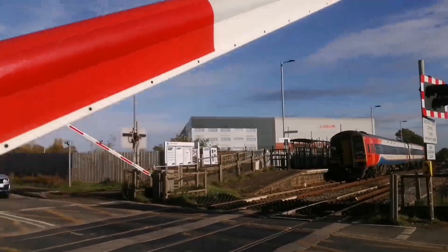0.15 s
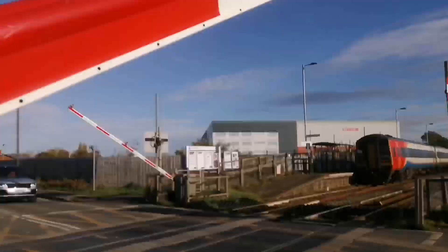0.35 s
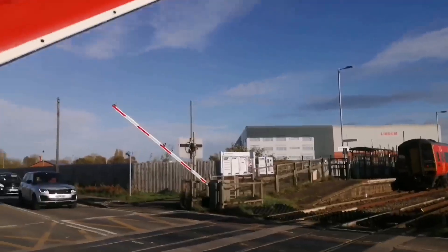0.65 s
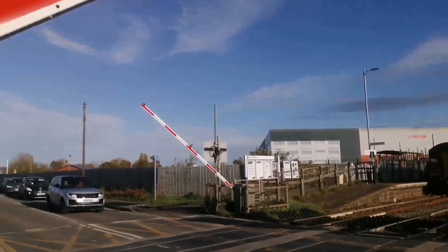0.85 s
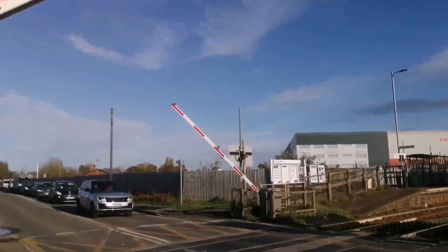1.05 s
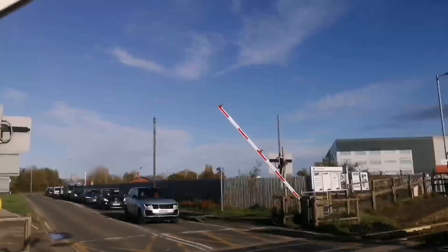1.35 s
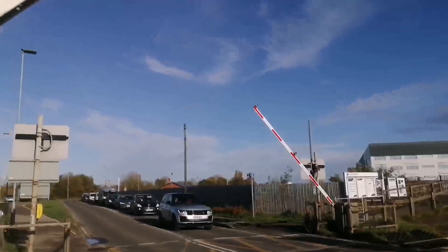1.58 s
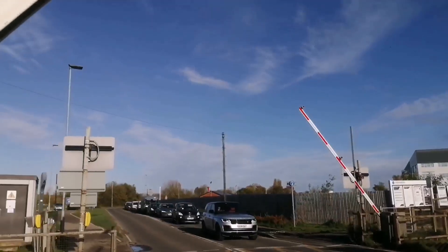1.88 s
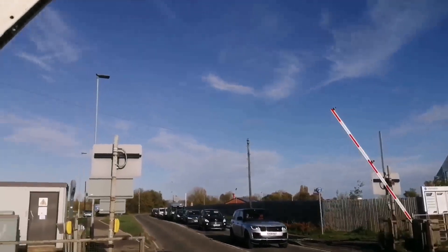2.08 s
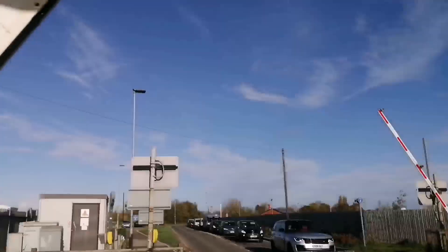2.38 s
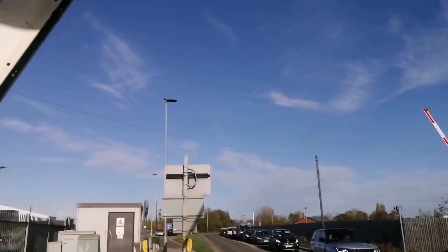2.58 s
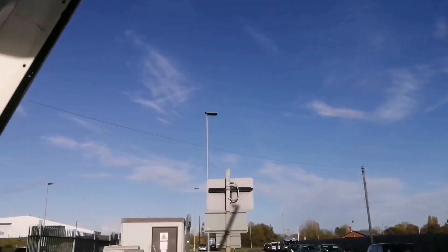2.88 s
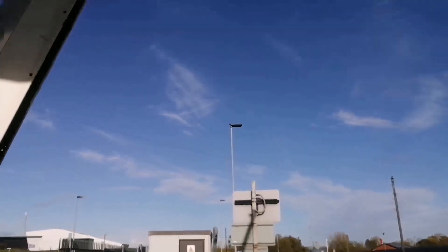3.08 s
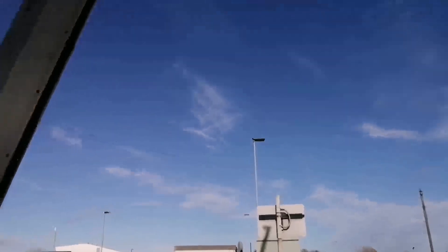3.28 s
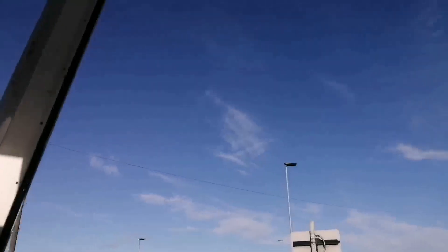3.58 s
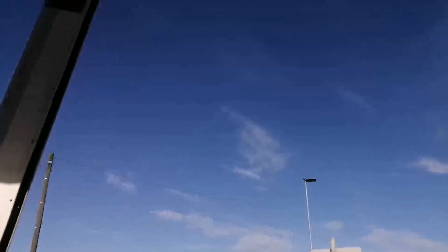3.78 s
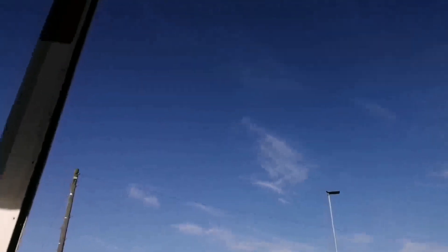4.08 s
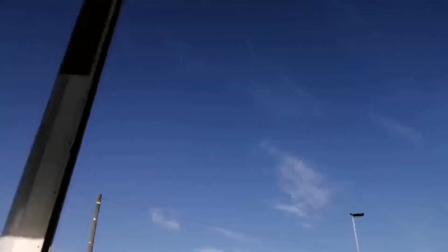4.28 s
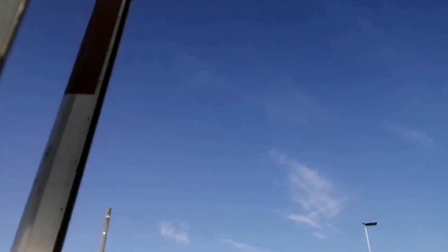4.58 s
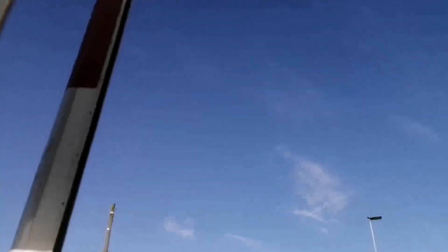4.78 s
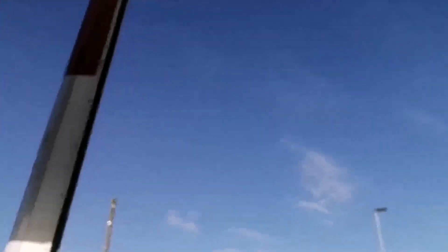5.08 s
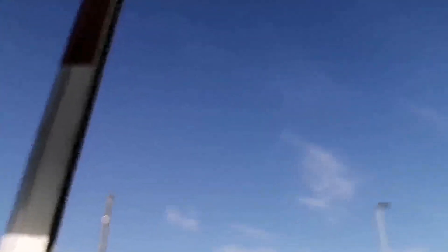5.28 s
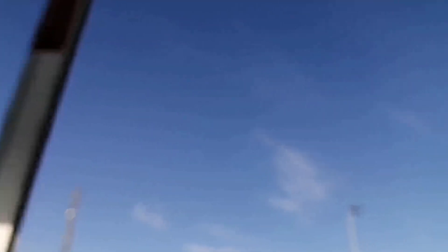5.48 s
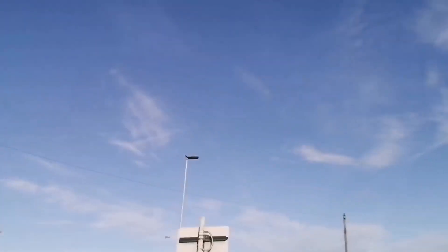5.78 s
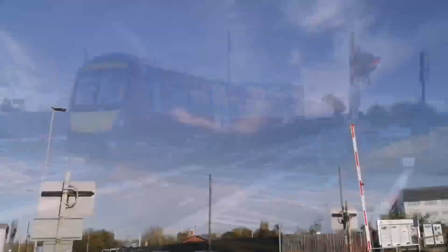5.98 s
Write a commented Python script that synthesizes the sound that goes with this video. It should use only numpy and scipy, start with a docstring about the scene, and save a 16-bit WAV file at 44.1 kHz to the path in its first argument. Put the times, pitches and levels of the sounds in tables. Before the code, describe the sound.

Steady low electric-hydraulic drone with buffeting wind and faint traffic, cutting out after four seconds into clicking, rattling and dull hollow thuds.

```python
"""A level-crossing barrier rises. From the start its hydraulic pump hums on harmonics of the shaft's turning,
gusts rumble and slap on the microphone as coloured noise and pulses, and traffic drones and hisses.
Oil soon hisses through valve resonances; later vehicles pull past as swells of resonant noise.
At the top the pump runs down, while loose parts clatter as ringing bumps, the linkage ticks as struck
modes, and the hollow boom knocks as decaying notes."""
import sys
import numpy as np
from scipy import signal
from scipy.io import wavfile

SR = 44100
rng = np.random.default_rng(int(sys.argv[2]) if len(sys.argv) > 2 else 0)


def int16_out(signal):
    """Quantize to a 16-bit WAV file."""
    q = np.round(np.clip(np.atleast_2d(signal).T, -1, 1) * 32767)
    wavfile.write(sys.argv[1], SR, q.astype(np.int16))


N = 271038  # samples

# Shaft speed. Each row: time in seconds, speed in turns per second before the sag at the stall.
SHAFT_SPEED = [(0, 70.3), (.07, 69.35), (.2, 69.3), (.37, 70.5), (.47, 69.95), (.62, 69.8), (.8, 70.2),
               (1.2, 70.3), (4, 70.42), (6.15, 70.42)]
# Pump load, heard as the pulse tone. Each row: time in seconds, level in dB.
PUMP_LOAD = [(0.0, -26.5), (0.06, -26), (0.13, -22.5), (0.2, -20), (0.27, -22.5), (0.37, -29.5),
             (0.52, -25.5), (0.8, -29), (1.2, -32), (1.55, -30), (2.5, -34), (3.6, -34.5), (4.05, -36),
             (4.11, -37), (4.135, -23.5), (4.152, -28), (4.165, -33), (4.178, -26), (4.205, -34),
             (4.215, -47), (4.23, -54), (4.27, -39.5)]
PULSES_PER_TURN = 5
# The shaft sags when the boom meets its stop.
STALL_S, STALL_WIDTH_S, SAG_TURNS_PER_S = 4.135, .021, 10.2
# Overtones of the labouring pump: shaft orders, and their levels in dB relative to the pulse tone at full sag.
STRAIN_ORDERS = [10, 15]
STRAIN_DB = [-17, -18]
# Order 10 of the whine fades steadily to a floor.
TENTH_DB, TENTH_FADE_DB_PER_S, TENTH_LEAST_DB = -50.5, 9.5, -65.5
# Orders that swell and fade. Each row of levels: time in seconds, then the level of each order in dB.
SINGING_ORDERS = [9, 19, 20, 21, 26, 30, 44]
SINGING_LEVELS = [(0, -68, -78, -74.5, -75, -72, -73, -75), (.5, -61.5, -77, -75, -71, -70.5, -71.5, -72),
                  (.9, -59.5, -72.5, -70, -66, -66, -74, -76.5), (1.5, -57, -71, -75, -70.5, -73, -77, -78),
                  (1.8, -62.5, -63, -74, -65, -72.5, -70, -69),
                  (2.2, -59, -78, -61.5, -63, -68, -74.5, -71.5),
                  (2.5, -64, -74, -71, -69.5, -74, -70, -70.5), (3, -70, -73, -69, -57, -66, -68.5, -72),
                  (3.5, -73.5, -70, -66, -65, -69.5, -69, -73.5),
                  (3.9, -75, -74, -70, -59, -64.5, -65.5, -70), (4.2, -76, -73, -74, -64, -66, -66, -73)]
# The comb of steadier orders: shaft orders, and their levels in dB relative to the comb level.
COMB_ORDERS = [11, 12, 25, 27, 31, 32, 34, 35, 36, 37, 39, 40, 41, 42, 43, 45, 46, 49, 54, 59, 65, 68, 69,
               70, 71, 72, 74, 75, 76, 77, 78, 79, 82, 83, 84, 85, 88, 93, 98]
COMB_DB = [1, -3, -2, -2, -5, -8, -7, -6, -5, -4, -4, -3, -4, -6, -3, -3, -5, -9, -10, -12, -9, -8, -5, -6,
           -6, -3, -1, 4, 3, -4, 0, 2, -5, 3, -5, -6, -5, -7, -5]
COMB_LEVEL_DB = -73
WHINE_END_S, WHINE_DIES_DB_PER_S = 4.12, 179

# Casing resonances. Each row: frequency in Hz, width in Hz, level in dB before the fade.
CASING_PEAKS = [(1813, 160, -65.5), (3110, 130, -66.5)]
CASING_FADES_S, CASING_FADE_DB_PER_S = 0.74, 8.5

# Wind on the microphone. Each row: time in seconds, rumble level in dB, then the levels of the deepest part
# and of the buffeting in dB relative to the rumble.
WIND_LEVELS = [(0.0, -42, 7, -4), (0.1, -47.5, -0.5, -8), (0.75, -38.5, 0, -4), (0.82, -39, -9, -3.5),
               (1.1, -41, 3.5, 1), (1.22, -36.5, 0.5, -8), (1.29, -41, 4, -2), (1.35, -33, -15, -5.5),
               (1.49, -47, 10, -5.5), (1.92, -30, -9, -11.5), (2.35, -34.5, -6.5, -7),
               (2.43, -25, -2.5, -0.5), (2.79, -26.5, -4, -6), (2.82, -24, 0, -14), (2.91, -33.5, -12, 5),
               (2.99, -21.5, -31, -13.5), (3.17, -25.5, -19.5, -1.5), (4.25, -39.5, 0, -1),
               (5.02, -37, -27, -4.5), (5.58, -42, -9, 2.5), (5.65, -43.5, 0, -6.5), (5.7, -42.5, -16, -2),
               (6.01, -33, -27.5, -8.5), (6.04, -40.5, -12, 11.5), (6.15, -33.5, 6, -6)]
# Rumble spectrum before the deepest part is set apart. Each row: frequency in Hz, relative density in dB per Hz.
RUMBLE_SPECTRUM = [(15, -7), (30, 3.5), (45, -2.5), (65, -1), (110, 0.5), (160, -21.5), (300, -44.5)]
# Buffeting spectrum. Each row: frequency in Hz, relative density in dB per Hz.
BUFFET_SPECTRUM = [(80, -17), (140, 2), (220, 1.5), (330, -21.5), (500, -22), (800, -45), (1300, -53)]
# Single puffs and lulls. Each row: centre in seconds, lift in dB, negative for a lull.
PUFFS = [(.36, 5.5), (.72, 6), (.88, -1), (.97, 5), (1.27, 5.5), (1.34, 1), (1.5, -1), (1.86, 4), (2.1, 4),
         (2.15, -9), (2.28, 4), (2.33, -7), (2.579, 6), (2.92, -7.5), (3.82, -4), (3.98, -12), (4.43, 7),
         (4.47, -3), (4.62, 4.5), (4.83, 7.5), (5.0, 6), (5.1, 9), (5.65, 10), (5.891, 0), (6.0, 3),
         (6.03, -11)]
PUFF_S = 0.019  # half-width
GUSTINESS_DB, GUSTS_HZ = 1.5, 9.0  # quick random swells of the whole wind

# Traffic. Each row: time in seconds, then levels in dB of the engine drone's lower part, its upper part,
# the tyre roar's lower part and its upper part.
TRAFFIC_LEVELS = [(0.0, -48, -61, -62, -58.5), (0.31, -50, -66.5, -64, -61), (0.82, -46, -59, -67, -60.5),
                  (1.42, -52, -59, -62, -63), (2.21, -53, -57.5, -60, -61.5),
                  (2.69, -39.5, -66.5, -61, -63.5), (3.01, -52, -54, -57.5, -59),
                  (3.39, -41.5, -49.5, -58, -53.5), (3.7, -49.5, -52.5, -58, -53.5),
                  (4.04, -57.5, -50, -55, -54), (4.45, -51, -49, -52.5, -54.5),
                  (4.86, -46, -49, -54.5, -55.5), (5.55, -45, -43.5, -56, -55),
                  (5.92, -51.5, -51, -56, -58.5), (6.15, -51, -64, -56, -64)]
# Engine drone spectrum before its halves are levelled. Each row: frequency in Hz, relative density in dB per Hz.
DRONE_SPECTRUM = [(200, 6.5), (350, 7), (550, -1), (750, -9.5), (1000, -12), (1400, -36.5), (2200, -36.5)]
# Tyre roar spectrum before its halves are levelled. Each row: frequency in Hz, relative density in dB per Hz.
ROAR_SPECTRUM = [(800, 5.5), (1100, 3), (1350, 2.5), (1600, 1.5), (1820, -1), (2050, -3.5), (2300, -4),
                 (2700, -3), (3100, -5), (3350, -7.5), (3700, -11.5), (4500, -12.5), (5500, -34)]
# High hiss. Each row: time in seconds, level in dB.
HISS_LEVEL = [(0.0, -55.5), (1.25, -56.5), (1.66, -52.5), (2.55, -59.5), (3.24, -55.5), (3.31, -55.5),
              (3.55, -53), (3.72, -56.5), (3.9, -53.5), (4.3, -53), (4.6, -53), (5.44, -51.5), (6.15, -58)]
# Hiss spectrum. Each row: frequency in Hz, relative density in dB per Hz.
HISS_SPECTRUM = [(2600, -22), (3100, -12), (3700, -17.5), (4200, -16), (4700, -6), (5400, 2), (5900, -4.5),
                 (6200, -5), (6900, -8.5), (7300, -25.5), (7800, -39)]

# Resonances of the valve block. Each row: frequency in Hz, width in Hz, relative density in dB per Hz.
VALVE_PEAKS = [(3520, 250, -10), (4310, 60, 6), (4440, 90, 1), (4650, 250, -10), (5250, 220, -3),
               (4900, 1800, -12), (6680, 250, -6), (6980, 250, -5)]
VALVE_OPENS_S, VALVE_SHUTS_S, VALVE_DB = 0.059, 0.277, -45.5
VALVE_OPEN_DB_PER_S, VALVE_SHUT_DB_PER_S = 300, 900

# Gusts slapping the microphone port. Each row: start in seconds, peak in dB before the port dulls it,
# time scale in seconds.
SLAPS = [(0.705, -30, 0.0052), (0.716, -30, 0.0013), (0.87, -35, 0.0012), (0.884, -29.5, 0.0014),
         (0.994, -30.5, 0.0012), (1.15, -33, .0013), (1.295, -28.5, 0.0039), (1.317, -30, 0.0016),
         (2.034, -23.5, 0.005), (2.262, -21.5, 0.0042), (2.393, -23, 0.0022), (2.47, -29.5, 0.0013),
         (2.553, -29.5, 0.0011), (2.5785, -15.5, 0.0016), (2.603, -25, 0.0015), (2.647, -32, 0.0016),
         (2.708, -31, 0.0015), (2.767, -25, 0.0017), (2.798, -22, 0.0022), (2.821, -15.5, 0.0025),
         (3.172, -23, 0.0015), (3.27, -33, 0.0014), (3.719, -26, 0.0029), (4.006, -30, 0.0029),
         (4.425, -21.5, 0.0046), (5.09, -27, 0.0029), (5.632, -30, 0.0087), (5.865, -23.5, 0.0069),
         (5.913, -23, 0.0034), (5.985, -23, 0.006), (6.052, -23.5, 0.0052), (6.095, -25, 0.002)]
SLAP_CUT_HZ = 1000

# Vehicles pulling past. Each row: nearest time in seconds, rise and fall to half height in seconds,
# frequency in Hz, width in Hz, level at the nearest time in dB.
PASSING_PEAKS = [(3.05, 0.1, .25, 1760, 210, -53), (3.5, .1, .1, 1750, 100, -65.5),
                 (3.07, 0.1, 0.11, 2570, 120, -58.5), (3.35, 0.09, 0.18, 2600, 400, -54),
                 (3.55, .1, .1, 1950, 300, -55), (3.29, .02, 0.15, 4520, 200, -61.5),
                 (3.7, 0.055, 0.3, 5150, 500, -54), (4.05, 0.11, 0.22, 830, 620, -45.5),
                 (4.9, 0.081, 0.074, 2000, 90, -62), (3.94, .12, 0.11, 2550, 220, -56)]

# Loose clatter of the settling boom. Each row: time in seconds, level in dB.
CLATTER_LEVEL = [(3.85, -74), (4.0, -44), (4.2, -52), (4.5, -55), (4.63, -39), (4.95, -54), (5.1, -47),
                 (5.35, -52), (5.52, -50), (5.7, -55), (5.9, -64)]
CLATTERS_PER_S, CLATTER_LOW_HZ, CLATTER_HIGH_HZ, CLATTER_CYCLES = 260, 350, 1273, 12

# Linkage ticks. Each row: time of contact in seconds, then peaks in dB of the low, middle and top modes.
TICKS = [(4.169, -41, -37, -34), (4.1716, -42, -33, -33), (4.177, -38, -39, -36), (4.1806, -41, -33, -44),
         (4.186, -47, -37, -42), (4.1915, -48, -37, -45), (4.1998, -55, -37, -57),
         (4.2344, -35.5, -36, -45), (4.2385, -43, -21, -35.5), (4.247, -51, -30, -54),
         (4.2528, -53, -45, -69), (4.265, -58, -45, -65), (4.283, -55, -48, -65), (4.307, -57, -45, -65),
         (4.3295, -51, -34, -70), (4.336, -52, -44, -59), (4.341, -49, -39, -59), (4.359, -58, -43, -38),
         (4.362, -58, -43, -39), (4.366, -56, -42, -39), (4.377, -58, -52, -46), (4.3973, -35, -33, -45),
         (4.4, -32, -29, -36), (4.4037, -40, -30, -50), (4.4113, -45, -32.5, -44), (4.422, -46, -42, -56),
         (4.4245, -47, -40, -65), (4.5022, -53, -35, -48), (4.997, -52, -32, -60), (5.0012, -59, -32, -58),
         (5.0912, -42, -36, -55), (5.467, -52, -36, -47), (5.497, -53, -37, -55)]
# Linkage modes in low, middle and top groups. Each row: frequency in Hz, relative level in dB,
# 60 dB decay time in seconds.
LINKAGE_MODES = [
    [(2370, -5, .03), (2640, -7, .04), (2910, 1.5, .04), (3450, 0, .03), (3770, -3, .03)],
    [(4200, -8, 0.037), (4535, 0, .055), (5043, -3.5, .05), (5210, 3, 0.06), (5470, 0.5, .06),
     (5800, -5.5, 0.045)],
    [(6100, -6, .04), (6360, -4.5, .035), (6570, -4, .03), (6920, 1, .035), (7080, 7, 0.05),
     (7400, -10, .025)],
]
CONTACT_S, RING_SHARE = 0.0013, 0.36  # half-length of a contact; share of the sound that rings on after it

# Knocks of the hollow boom. Each row: start in seconds, level of the note in dB, pitch in Hz,
# level of the bright clack in dB relative to the note.
KNOCKS = [(4.626, -41, 1340, -7), (4.637, -28.5, 607, -17), (4.668, -27, 440, -7), (4.743, -34.5, 920, -12),
          (4.774, -26.5, 383, -24), (4.824, -29, 540, -21), (4.862, -41, 615, -2), (4.884, -29.5, 375, -19),
          (4.988, -27, 363, -18), (5.003, -31.5, 436, -16), (5.058, -31, 390, -10), (5.073, -35, 443, 1),
          (5.089, -28, 375, -15), (5.106, -29, 518, 3), (5.177, -39, 338, -10), (5.144, -32, 365, -12),
          (5.217, -31.5, 587, -10), (5.219, -33, 810, -9), (5.275, -23.5, 370, -12), (5.296, -30, 350, -13),
          (5.331, -36, 388, -7), (5.4655, -23, 406, -22), (5.511, -18.5, 596, -20), (5.526, -33, 480, -20),
          (5.544, -31, 584, -12), (5.642, -39, 766, -14)]
KNOCK_LASTS_S, RISE_CYCLES = 0.009, 1.8
SHUDDER_SHARE, SHUDDER_T60_S, CLACK_T60_S = 0.2, 0.2, .035

CUTOFF_HZ = 7600


def amp(db):
    """Definition of the decibel: 20 dB is a factor of ten in amplitude."""
    return 10 ** (np.asarray(db) / 20)


def rms_one(x):
    """Normalisation: division by the root mean square."""
    return x / np.sqrt(np.mean(x ** 2) + 1e-20)


def in_time(rows):
    """Linear interpolation: table columns become curves, one value a sample."""
    s, *columns = np.transpose(rows)
    return [np.interp(np.arange(N) / SR, s, column) for column in columns]


def drift(rate_hz):
    """Slow random modulation: coarse noise through a double one-pole low-pass, with spread near 1."""
    pole = np.exp(-80 * np.pi * rate_hz / SR)  # one coarse step is 40 samples
    coarse = rng.standard_normal(N // 40 + 2002)
    slow = signal.lfilter([1], [1, -2 * pole, pole * pole], coarse)[2000:]
    return np.interp(np.arange(N) / 40, np.arange(len(slow)), rms_one(slow))


def coloured(spectrum, lumps_db, rate_hz, count):
    """Band synthesis: noise bands follow a spectrum, their levels wavering partly together; rms 1."""
    hz, density_db = np.transpose(spectrum)
    edges = np.geomspace(hz[0], hz[-1], count + 1)
    white = rng.standard_normal((2, N + 8000))  # neighbouring bands take different noise
    together = drift(rate_hz)
    out = 0
    for k, (low, high) in enumerate(zip(edges, edges[1:])):
        band_pass = signal.butter(2, [low, high], "band", fs=SR, output="sos")
        band = signal.sosfilt(band_pass, white[k % 2])[8000:]
        level_db = np.interp(np.log(low * high) / 2, np.log(hz), density_db)
        lump_db = lumps_db * (0.69 * together + drift(rate_hz))
        out = out + amp(level_db + lump_db) * band
    return rms_one(out)


def halves(x, split_hz, low_db, high_db):
    """Spectral division: the parts below and above a frequency each take their own level."""
    low = signal.sosfilt(signal.butter(4, split_hz, "low", fs=SR, output="sos"), x)
    high = signal.sosfilt(signal.butter(4, split_hz, "high", fs=SR, output="sos"), x)
    return amp(low_db) * rms_one(low) + amp(high_db) * rms_one(high)


def ring(x, hz, t60_s):
    """Damped oscillator: a unit click sets a decaying sine of starting height 1 ringing."""
    radius = amp(-60 / (max(t60_s, .003) * SR))
    angle = 2 * np.pi * hz / SR
    return signal.lfilter([0, np.sin(angle)], [1, -2 * radius * np.cos(angle), radius * radius], x)


def resonant(noise, hz, width_hz):
    """Resonance: damping sets the width of the peak, through which noise passes twice; rms 1."""
    t60_s = np.log(1000) / np.pi / width_hz
    return rms_one(ring(ring(noise, hz, t60_s), hz, t60_s))


def add(out, s, x):
    """Superposition: a short sound is summed in at a time in seconds."""
    i = round(s * SR)
    out[i:i + len(x)] += x[:N - i]


def pump():
    """Order synthesis: every tone is a multiple of one shaft angle, while levels waver independently."""
    t = np.arange(N) / SR
    sag = (1 + np.tanh((t - STALL_S) / STALL_WIDTH_S / 2)) / 2  # 0 to 1
    turn = 2 * np.pi * np.cumsum(in_time(SHAFT_SPEED)[0] - SAG_TURNS_PER_S * sag) / SR
    load_db = in_time(PUMP_LOAD)[0]
    running = t < PUMP_LOAD[-1][0]
    out = amp(load_db + 1.0 * drift(7.2)) * np.sin(PULSES_PER_TURN * turn) * running
    for order, db in zip(STRAIN_ORDERS, STRAIN_DB):
        strain = amp(load_db + db + 2.0 * drift(20)) * np.sin(order * turn)
        out += strain * running * sag ** 3
    dying_db = -WHINE_DIES_DB_PER_S * np.maximum(t - WHINE_END_S, 0)
    tenth_db = np.maximum(TENTH_DB - TENTH_FADE_DB_PER_S * np.maximum(t - .5, 0), TENTH_LEAST_DB)
    out += amp(tenth_db + dying_db + 1.5 * drift(10)) * np.sin(10 * turn)
    for order, level_db in zip(SINGING_ORDERS, in_time(SINGING_LEVELS)):
        out += amp(level_db + dying_db + 2.0 * drift(4.6)) * np.sin(order * turn)
    for order, db in zip(COMB_ORDERS, COMB_DB):
        level_db = COMB_LEVEL_DB + dying_db + db + 3.0 * drift(2.5)
        out += amp(level_db) * np.sin(order * turn + rng.uniform(0, 2 * np.pi))
    return np.sqrt(2) * out  # levels in the tables are rms


def casing():
    """Resonant filtering: broadband pump noise in the casing's resonances makes a breathy whine."""
    noise, t = rng.standard_normal(N), np.arange(N) / SR
    fade_db = -CASING_FADE_DB_PER_S * np.maximum(t - CASING_FADES_S, 0)
    out = 0
    for hz, width_hz, db in CASING_PEAKS:
        out = out + amp(db + fade_db + 2.5 * drift(2.3)) * resonant(noise, hz, width_hz)
    return out


def wind():
    """Turbulent pressure on the microphone port: a deep rumble and a brighter buffeting share the gusts."""
    rumble_db, deep_db, buffet_db = in_time(WIND_LEVELS)
    t = np.arange(N) / SR
    gust_db = GUSTINESS_DB * drift(GUSTS_HZ)
    for s, lift_db in PUFFS:
        gust_db = gust_db + lift_db * np.exp(-((t - s) / PUFF_S) ** 2)
    rumble = coloured(RUMBLE_SPECTRUM, lumps_db=0.2, rate_hz=55.0, count=8)
    rumble = halves(rumble, 46.7, deep_db, 0)
    buffet = coloured(BUFFET_SPECTRUM, lumps_db=2.0, rate_hz=12.0, count=8)
    return amp(rumble_db + gust_db) * (rumble + amp(buffet_db) * buffet)


def street():
    """Incoherent summation: engines, tyres and a high hiss are separate bodies of coloured noise."""
    drone_db, drone_top_db, roar_db, roar_top_db = in_time(TRAFFIC_LEVELS)
    drone = coloured(DRONE_SPECTRUM, lumps_db=1.5, rate_hz=38.0, count=9)
    roar = coloured(ROAR_SPECTRUM, lumps_db=1.5, rate_hz=5.0, count=24)
    hiss = coloured(HISS_SPECTRUM, lumps_db=1.5, rate_hz=7.5, count=14)
    traffic = halves(drone, 700, drone_db, drone_top_db) + halves(roar, 2000, roar_db, roar_top_db)
    return traffic + amp(in_time(HISS_LEVEL)[0]) * hiss


def valve():
    """Turbulent jet noise: oil forced through the valve is heard in the resonances of its block."""
    jet, t = rng.standard_normal(N), np.arange(N) / SR
    out = 0
    for k, (hz, width_hz, db) in enumerate(VALVE_PEAKS):
        sign = (-1) ** k
        out = out + sign * amp(db) * np.sqrt(width_hz) * resonant(jet, hz, width_hz)
    flow_db = VALVE_DB - VALVE_OPEN_DB_PER_S * np.maximum(VALVE_OPENS_S - t, 0)
    flow_db -= VALVE_SHUT_DB_PER_S * np.maximum(t - VALVE_SHUTS_S, 0)
    return amp(flow_db + 0.5 * drift(27)) * rms_one(out)


def slaps():
    """Time-bandwidth reciprocity: each slap is a damped push and pull; the shorter, the brighter."""
    out = np.zeros(N)
    signs = rng.choice([-1, 1], len(SLAPS))
    for (s, db, length_s), sign in zip(SLAPS, signs):
        u = np.arange(SR // 20) / SR / max(length_s, .0008)
        swing = u * np.exp(-u * 1.3) * np.sin(2 * np.pi * u / 1.66)
        add(out, s, sign * amp(db) * swing / np.abs(swing).max())
    # the port dulls the edge
    return signal.sosfilt(signal.butter(3, SLAP_CUT_HZ, fs=SR, output="sos"), out)


def passing():
    """Amplitude modulation by nearness: resonant noise swells and fades as each vehicle goes by."""
    noise, t = rng.standard_normal(N), np.arange(N) / SR
    out = 0
    for s, rise_s, fall_s, hz, width_hz, db in PASSING_PEAKS:
        nearness = 1 / (1 + ((t - s) / np.where(t < s, rise_s, fall_s)) ** 2)
        out = out + nearness * amp(db + 0.75 * drift(7.3)) * resonant(noise, hz, width_hz)
    return out


def clatter():
    """Random impulse excitation: uneven bumps each ring a few cycles at one of twelve pitches."""
    t = np.arange(N) / SR
    sizes = amp(4.0 * np.minimum(rng.exponential(1, N), 2.5))
    bumps = sizes * (rng.random(N) < CLATTERS_PER_S / SR)
    pitch_of_bump = rng.integers(0, 12, N)
    out = 0
    for k, hz in enumerate(np.geomspace(CLATTER_LOW_HZ, CLATTER_HIGH_HZ, 12)):
        t60_s = CLATTER_CYCLES / hz
        struck = bumps * (pitch_of_bump == k) + 1e-18
        out = out + hz ** 0.5 * ring(ring(struck, hz, t60_s), hz, t60_s)
    return amp(in_time(CLATTER_LEVEL)[0]) * rms_one(out) * (t > CLATTER_LEVEL[0][0])


def ticks():
    """Modal excitation: a short rounded contact strikes every mode unequally, and part of it rings on."""
    out, t = np.zeros(N), np.arange(SR // 6) / SR
    after = t - 3 * CONTACT_S  # time from the middle of the contact
    contact = np.exp(-(after / CONTACT_S) ** 2)
    struck = (1 + np.tanh(after / CONTACT_S)) / 2
    for s, *group_db in TICKS:
        for db, modes in zip(group_db, LINKAGE_MODES):
            x = 0
            for hz, mode_db, t60_s in modes:
                strength = amp(mode_db + rng.normal(0, 3.2))
                tone = np.sin(2 * np.pi * (hz * rng.normal(1, 0.0083) * t + rng.random()))
                decay = amp(-60 * np.maximum(after, 0) / t60_s)
                x = x + strength * tone * (contact + RING_SHARE * struck * decay)
            add(out, s - 3 * CONTACT_S, amp(db) * x / np.abs(x).max())
    return out


def knocks():
    """Impact on a hollow body: a soft blow rings a note, with a bright clack and a lingering shudder."""
    out, t = np.zeros(N), np.arange(SR // 4) / SR
    bright = signal.butter(4, [700, 1300], "band", fs=SR, output="sos")
    for s, db, hz, bright_db in KNOCKS:
        rise = 1 - np.exp(-(t * hz / RISE_CYCLES) ** 2)
        swell = rise * np.exp(-(t / KNOCK_LASTS_S) ** 2)
        overtone = 0.3 * np.sin(2 * np.pi * 1.5 * hz * t) * np.exp(-t / 0.006)
        note = swell / swell.max() * (np.sin(2 * np.pi * hz * t) + overtone)
        shudder = resonant(rng.standard_normal(len(t)), hz, 300.0) * amp(-60 * t / SHUDDER_T60_S)
        clack = rms_one(signal.sosfilt(bright, rng.standard_normal(len(t))))
        clack = clack * amp(bright_db - 60 * t / CLACK_T60_S)
        add(out, s, amp(db) * (note + rise * (SHUDDER_SHARE * shudder + clack)))
    return out


def scene():
    """Linear superposition: all sources add at one microphone."""
    machine = pump() + casing() + valve()
    surroundings = wind() + street() + slaps() + passing()
    boom = clatter() + ticks() + knocks()
    return (machine + surroundings + boom)[None]


def record(dry):
    """Saturation and band limiting: strong peaks are rounded, then the top is rolled off and cut."""
    rounded = .45 * np.tanh(dry / .45)
    soft = signal.sosfilt(signal.butter(8, 7100, fs=SR, output="sos"), rounded)
    return signal.sosfilt(signal.ellip(8, .5, 40, CUTOFF_HZ, fs=SR, output="sos"), soft)


dry = scene()
out = record(dry)
int16_out(out)
```